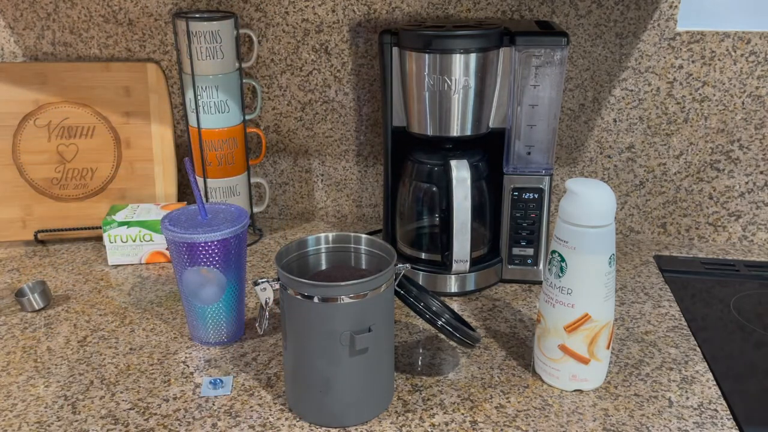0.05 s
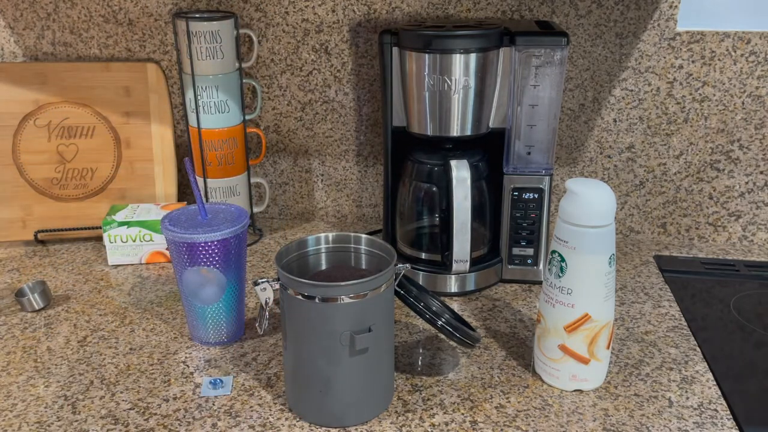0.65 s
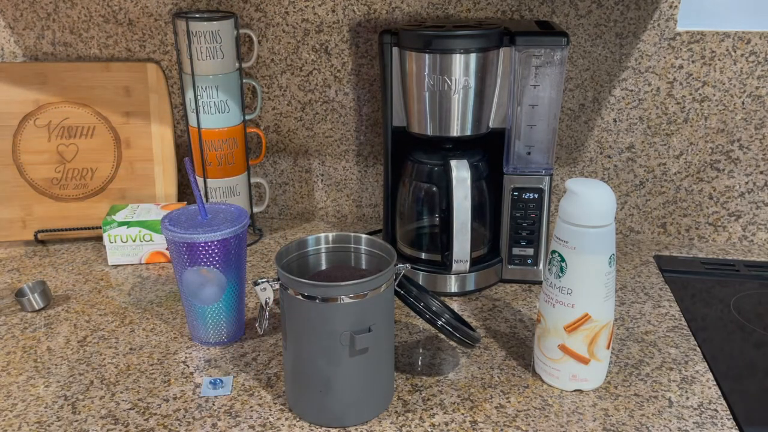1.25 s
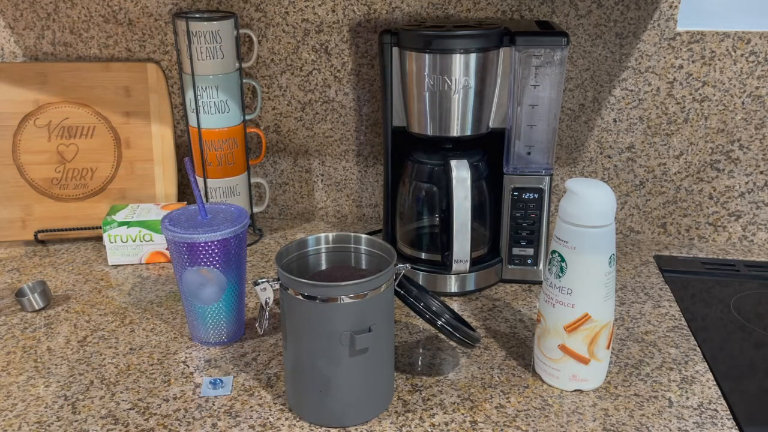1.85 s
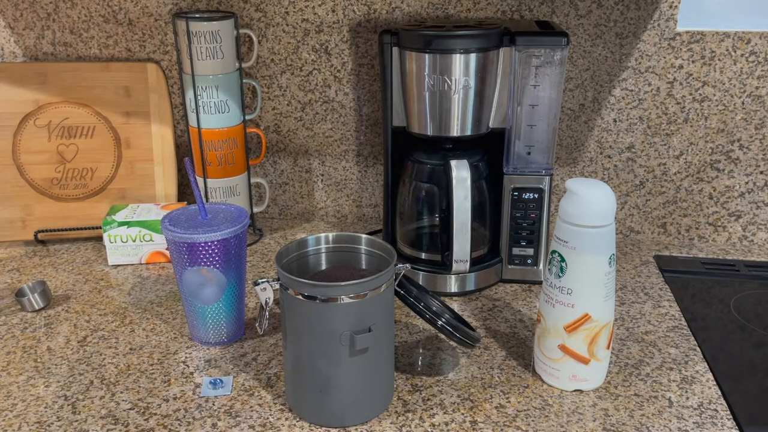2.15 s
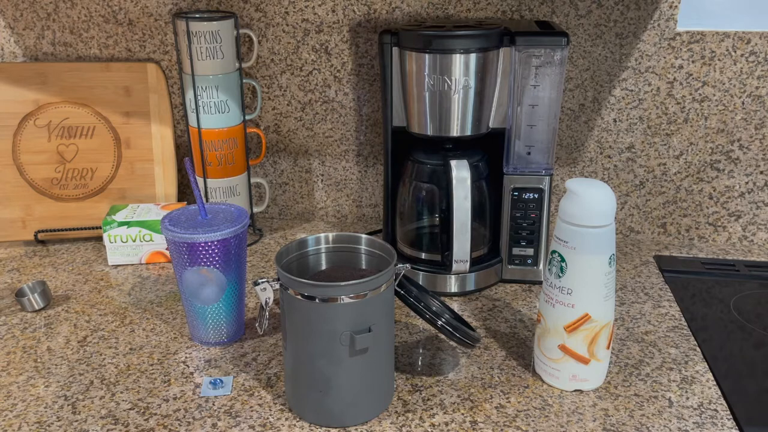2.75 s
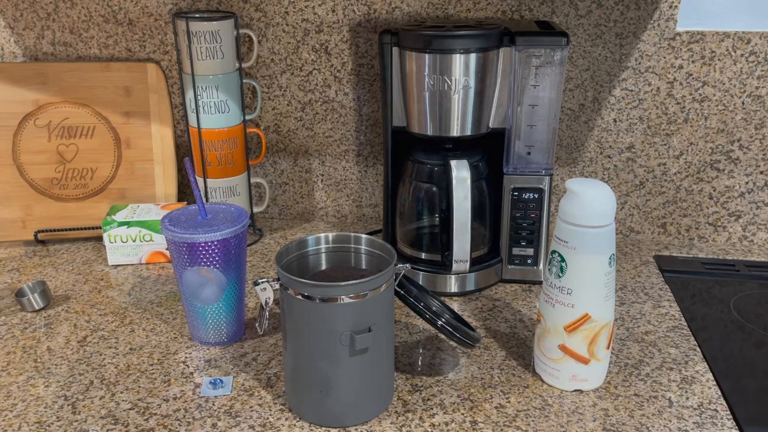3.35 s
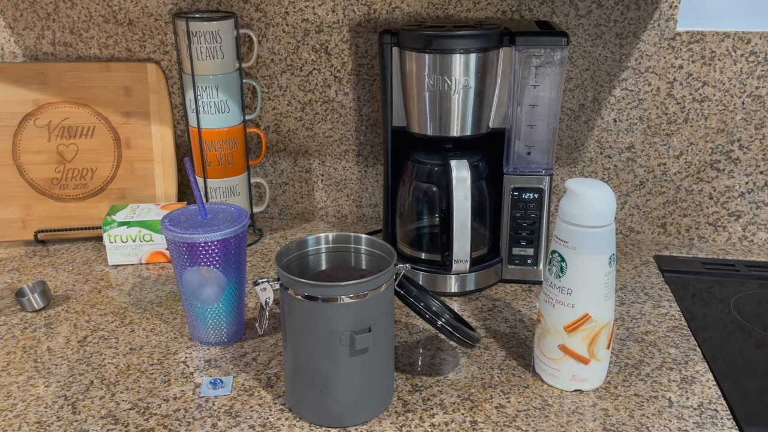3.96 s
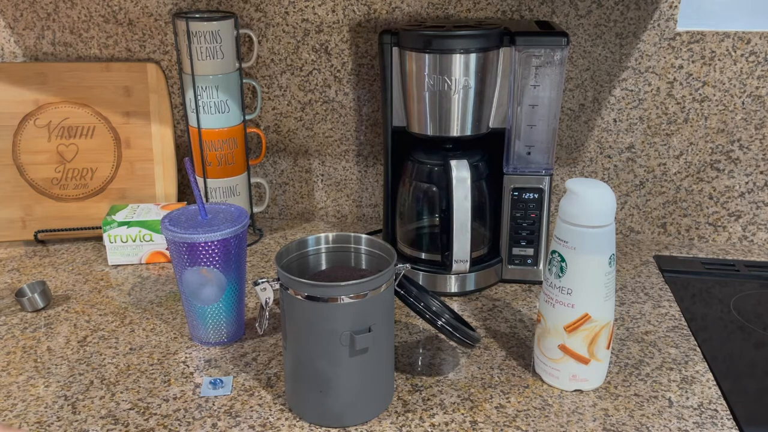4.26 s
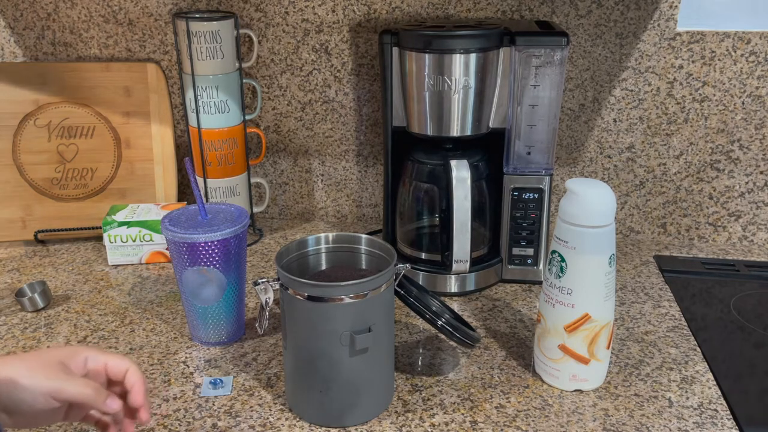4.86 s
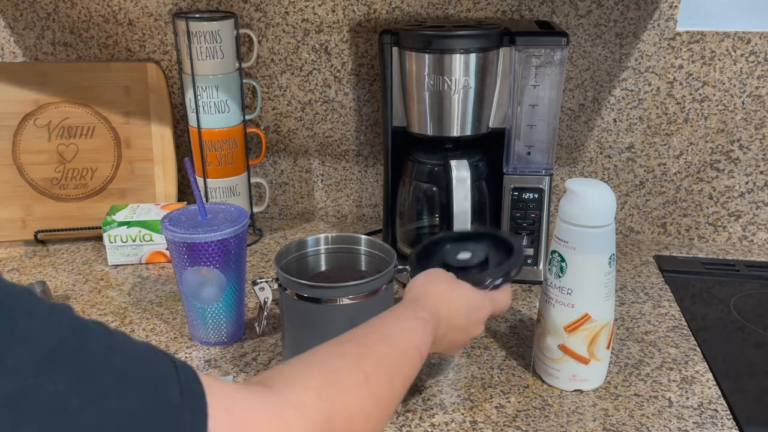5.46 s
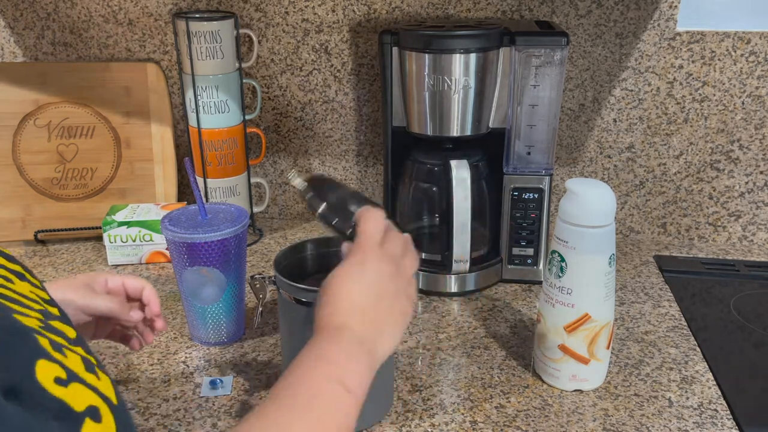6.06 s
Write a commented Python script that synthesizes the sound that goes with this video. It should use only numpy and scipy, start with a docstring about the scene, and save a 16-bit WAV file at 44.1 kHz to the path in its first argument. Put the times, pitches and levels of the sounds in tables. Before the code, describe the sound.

A stiff bag crackles as coffee grounds are shaken out, followed by dull bumps, a clink and a canister lid clacking.

```python
"""A stiff bag crackles in a small kitchen as coffee grounds are shaken out: creases snap, panels
flap and the grounds patter over the film. The bag is put away with dull bumps on the worktop,
scrapes and a clink of kitchenware. Something hollow ticks lightly, then the lid of a steel canister
is picked up from the stone counter, its shell clacking and its rim ringing faintly.
An appliance hums under it all."""
import sys
import numpy as np
from scipy import signal
from scipy.fft import rfft, irfft, next_fast_len
from scipy.io import wavfile
from scipy.ndimage import uniform_filter1d

SR = 44100
rng = np.random.default_rng(int(sys.argv[2]) if len(sys.argv) > 2 else 0)


def waveform_to_disk(signal):
    """Save audio, clipped to [-1, 1], as 16-bit WAV at the path in sys.argv[1]."""
    frames = np.transpose(np.atleast_2d(signal))
    scaled = np.clip(frames, -1, 1) * 32767
    samples = np.round(scaled).astype(np.int16)
    wavfile.write(sys.argv[1], SR, samples)


N = 273420

# Levels are relative within a table; each layer sets its own gain. Spectra give level per Hz.
# Air of the quiet kitchen (f/Hz, level/dB)
AIR_SPECTRUM = [(15, -44.5), (36, 2), (92, -2.5), (166, -2.5), (254, -9.5), (324, -11), (583, -18),
                (1000, -26.5), (1790, -29.5), (2280, -29.5), (2900, -44), (8030, -26), (12000, -48.5),
                (15600, -80)]
# Tones of the appliance (f/Hz, level/dB)
HUM_TONES = [(59, -72), (177.6, -91.5), (231.5, -85), (333.8, -79)]
# Decay of the room's tail (f/Hz, t60/s)
ROOM_DECAY = [(200, 0.43), (1400, 0.35), (4000, 0.4), (10000, 0.27)]

# Hands, sleeves and film brushing things (t/s, length/s, level/dB)
BRUSH_STROKES = [(1.52, 0.024, -52), (1.784, 0.13, -58.5), (2.037, 0.14, -55.5), (2.29, 0.27, -58.5),
                 (2.53, 0.013, -44), (3.01, 0.18, -61.5), (3.445, 0.58, -68.5), (4.142, 0.027, -60),
                 (4.528, 0.2, -61), (4.974, 0.018, -59), (5.24, 0.025, -62), (5.379, 0.25, -64)]
# Bright patter of brushing and of running grounds (f/Hz, level/dB)
PATTER_SPECTRUM = [(800, -12.5), (2000, -5), (4000, -6), (6700, -8), (8000, 1), (9300, -1), (11000, -2.5),
                   (14000, -4.5)]
# Dry squeaks (t/s, length/s, f/Hz, level/dB)
DRY_SQUEAKS = [(1.978, 0.08, 3060, -55), (5.394, 0.012, 2960, -60)]
# Things dragged over the counter (t/s, length/s, scrape level/dB, rumble level/dB)
DRAG_STROKES = [(1.666, 0.2, -64, -59), (1.957, 0.33, -66, -68), (2.505, 0.027, -50.5, -43.5),
                (2.572, 0.019, -55, -46), (2.693, 0.044, -48.5, -43), (2.977, 0.068, -53, -51.5),
                (3.06, 0.055, -54.5, -55.5), (3.804, 0.13, -74, -59.5), (4.195, 0.65, -70.5, -65),
                (4.942, 0.19, -66.5, -61.5), (5.185, 0.31, -63, -58.5), (5.504, 0.03, -51, -45.5),
                (5.8, 0.091, -87, -65.5)]
# Low weight of a drag (f/Hz, level/dB)
RUMBLE_SPECTRUM = [(35, -32), (60, -11), (151, -6), (194, -5.5), (283, -12.5), (355, -5), (700, -12.5),
                   (910, -35.5), (1540, -120)]
# Grit of a drag (f/Hz, level/dB)
SCRAPE_SPECTRUM = [(260, -50), (450, -29), (533, -6), (774, -6), (862, -5.5), (1650, -8), (1860, -13.5),
                   (2150, -12.5), (5380, -21.5), (8000, -22), (10400, -19), (17600, -120)]
# Hollow body being dragged (f/Hz, width/Hz, level/dB)
DRAG_MODES = [(370, 55, 0), (830, 510, -19)]
# Light ticks (t/s, level/dB)
TICK_HITS = [(3.655, -62), (3.7252, -59), (3.8725, -58), (3.9822, -55), (4.0332, -54.5), (4.151, -52),
             (4.243, -52), (4.289, -51.5), (4.3514, -62), (4.374, -56), (4.507, -47), (4.5865, -54),
             (4.6351, -51), (4.681, -52.5), (4.7529, -50.5), (4.805, -49.5), (4.834, -54), (4.939, -52),
             (4.9702, -53), (5.0416, -50.5), (5.0787, -50), (5.276, -48), (5.3131, -48.5), (5.37, -51),
             (5.4184, -50)]
# Hollow thing that ticks (f/Hz, width/Hz, level/dB)
TICK_MODES = [(896, 220, 12), (1504, 170, 14), (1724, 90, 9), (2140, 110, 5)]
# Hollow vessel (f/Hz, width/Hz, level/dB)
VESSEL_MODES = [(186, 21, -8), (402, 40, -8.5), (535, 28, 0.5), (1038, 66, -10)]
# Kitchenware rubbing (t/s, length/s, level/dB)
RUB_STROKES = [(2.926, .01, -53), (2.974, 0.036, -53), (3.012, 0.018, -47.5)]
# Kitchenware touching (t/s, level/dB)
CLINK_HITS = [(2.783, -40.5), (3.087, -43), (3.139, -30)]
# Ring of the kitchenware (f/Hz, width/Hz, level/dB)
WARE_MODES = [(876, 22, 3.5), (1140, 17, -8), (1502, 26, 0.5), (1766, 16, -4), (2013, 15, 2), (2510, 16, 0),
              (2624, 11, 3.5), (3752, 15, -7), (4100, 22, -0.5), (4260, 12, -8)]
# The lid clacking in the hand (t/s, level/dB)
LID_HITS = [(5.164, -35), (6.002, -49)]
# The lid's hollow shell (f/Hz, width/Hz, level/dB)
SHELL_MODES = [(1020, 190, -1.5), (1530, 220, 2.5), (2180, 200, 0), (4580, 350, -12)]
# The lid's steel rim (f/Hz, level/dB)
RIM_MODES = [(2347, 0), (4694, -13)]
# Padded blows on the worktop (t/s, level/dB, low-pass corner f/Hz)
BUMP_HITS = [(2.493, -26.5, 230), (2.514, -41, 200), (2.531, -33, 330), (2.594, -28.5, 170),
             (2.609, -34.5, 130), (2.686, -34, 900), (2.702, -33.5, 550), (2.726, -29.5, 900),
             (2.744, -34, 302), (2.784, -39, 505), (3.016, -34, 247), (5.506, -30.5, 1200),
             (5.524, -31.5, 1000)]
# Low boomy pitches of the bumps (f/Hz, width/Hz, level/dB)
BUMP_PEAKS = [(106.4, 19, -7.5), (197, 16, 1), (272, 43, -4), (358, 19, 4.5), (532, 35, 4.5),
              (946, 89, 8.5), (1360, 42, -8)]
# Knocks of bag, kitchenware and lid (t/s, level/dB, body f/Hz, thud over body/dB, hardness/dB)
KNOCK_HITS = [(0.054, -24, 1530, -17.5, -40), (0.136, -21.5, 800, -6, -0.5), (0.18, -21.5, 1280, -20, -8),
              (0.267, -17.5, 1350, -16.5, -2), (0.395, -26, 1050, -11, -0.5),
              (0.592, -26.5, 1610, -12.5, -20), (0.674, -25.5, 710, -24, -10), (0.78, -26, 1050, -26, -2),
              (1.04, -21.5, 3420, -44, 4), (1.138, -28.5, 1500, 4, -6.5), (1.417, -23, 530, -4.5, -6.5),
              (1.818, -41.5, 1400, -3, 19), (2.004, -37.5, 1370, -21, 6), (2.033, -37, 1400, 2, 8),
              (2.097, -29.5, 1600, -34, 8.5), (2.194, -32.5, 760, -24, 12), (2.33, -40, 1360, -2, 13),
              (2.451, -39.5, 920, -15, -11), (2.524, -27.5, 1020, 8, -15), (2.619, -31.5, 544, 36, 60),
              (2.724, -33.5, 795, -14, 2), (2.782, -32.5, 820, -7, -6), (2.785, -39.5, 2930, -8, -14),
              (2.876, -42.5, 720, -16, -26), (3.021, -38.5, 1010, -14, -6), (3.088, -30.5, 1150, -13, -23),
              (3.14, -30, 893, -27, -2), (3.419, -48, 1350, -8, -5), (3.896, -38, 1330, -24, -27),
              (3.898, -43.5, 3050, -27, -7), (5.294, -42, 1520, 13, 60), (5.506, -36, 875, -8, -14),
              (5.548, -41, 870, -16, -9), (5.585, -31.5, 954, -7, -0.5), (6.1548, -36, 1120, 11, 12)]

# Flow of the grounds (t/s, level/dB)
POUR_CURVE = [(0.0, -36), (0.11, -50.5), (0.2, -34), (0.322, -45), (0.52, -40.5), (0.998, -37),
              (1.108, -37.5), (1.24, -44), (1.33, -48.5), (1.444, -47.5), (1.594, -47.5), (1.7, -71)]
# Shakes that jolt the bag (t/s, level/dB)
BAG_SHAKES = [(0.061, -35.5), (0.15, -31.5), (0.262, -34.5), (0.391, -37), (0.548, -36), (0.673, -39.5),
              (0.85, -43.5), (1.416, -46), (1.2, -38), (1.51, -44)]
# Small creases crackling (f/Hz, level/dB)
CRINKLE_SPECTRUM = [(88, -60.5), (150, -15), (464, -4.5), (558, 1), (886, 0), (972, 5.5), (4780, -6),
                    (6910, -6.5), (8960, -0.5), (10200, -15), (11200, -1.5), (12500, -11.5), (16200, -55),
                    (22000, -120)]
# The bag's walls bending (f/Hz, level/dB)
FLEX_SPECTRUM = [(90, -13), (190, -7.5), (280, -12), (370, 0), (550, -3.5), (800, -0.5), (1500, -27.5)]
# Big creases snapping (t/s, level/dB, panel f/Hz, brightness/dB: a tilt from crack to fizz)
CREASE_SNAPS = [(0.0511, -8.5, 1480, -7), (0.1316, -9, 810, 2), (0.1505, 1.5, 2020, 0.5),
                (0.161, -13.5, 990, 10), (0.167, 0.5, 1320, -1.5), (0.2202, -6.5, 1870, 0),
                (0.25, -18.5, 3100, -12), (0.261, -3.5, 2350, -2.5), (0.2737, -18, 1000, 10),
                (0.3327, -12, 2230, 3.5), (0.361, -4, 1120, 1), (0.374, -7.5, 2830, 6),
                (0.392, -10, 2640, -7.5), (0.436, -8, 2260, 6.5), (0.5025, -20, 3100, -4.5),
                (0.582, -9, 1920, 0), (0.651, -22.5, 2140, 8), (0.6701, -9.5, 2490, -3),
                (0.6941, -11.5, 2140, -1), (0.7092, -13, 2250, -3), (0.761, -18, 2460, 1),
                (0.7873, 10.5, 1060, 27), (0.804, -10.5, 2240, -0.5), (0.8602, -17, 2350, -5.5),
                (0.8978, -18, 2150, -2.5), (0.9359, -8.5, 2250, 8), (0.9714, -3.5, 2430, -3.5),
                (1.003, -3, 2170, -1.5), (1.0096, -11, 2130, 4), (1.0296, -11.5, 3560, -10.5),
                (1.0364, -11.5, 3600, -12), (1.074, -15.5, 4300, -9), (1.0802, -21, 2080, -13),
                (1.135, -19.5, 2080, -4), (1.1969, -6.5, 2460, -1), (1.258, -8.5, 1680, 8),
                (1.5013, -19, 2040, -3)]

# Stereo width (f/Hz, side level/dB)
STEREO_WIDTH = [(40, -15), (130, -13), (280, -6), (550, -1.5), (1400, 0), (2800, -6), (6500, -4.5),
                (8400, -14), (12000, -51)]
# Stereo balance (f/Hz, left over right level/dB)
STEREO_BALANCE = [(100, 1), (500, 2), (1200, 1.5), (4500, 3.5), (6500, 3.5), (8000, 0)]
# Phase between the microphone ports (f/Hz, left lead/rad)
PORT_LEAD = [(200, 0), (2000, .3), (3400, 1.1), (4400, .6), (5600, .8), (6700, .1), (7700, 1), (8600, 0),
             (9400, -1.5), (10250, -3.1), (11000, -4.5), (11900, -6.1), (12600, -6.4), (13700, -9.4),
             (15500, -12.6)]
# Treble resonance and roll-off of the ports (f/Hz, level/dB)
PORT_RESPONSE = [(9000, 1), (10300, 6.5), (11200, 3), (12200, -19.5), (13200, -36.5), (15000, -49.5)]


def amp(db):
    """Decibels to gain."""
    return 10 ** (np.asarray(db) / 20)


def unit(x):
    """x scaled to rms 1."""
    return x / np.sqrt(np.mean(x ** 2) + 1e-20)


def along(points, hz):
    """Curve through (f/Hz, value) points on a log frequency axis."""
    freqs, values = np.transpose(points)
    return np.interp(np.log(hz + 1), np.log(freqs + 1), values)


def add(track, s, x):
    """Mix x into the track at time s."""
    part = track[:, max(round(s * SR), 0):][:, :x.shape[-1]]
    part += x[..., :part.shape[1]]


def filtered(x, response):
    """x times a complex response of frequency."""
    size = next_fast_len(x.shape[-1] + SR // 4)
    return irfft(rfft(x, size) * response(np.fft.rfftfreq(size, 1 / SR)), size)[..., :x.shape[-1]]


def coloured(x, spectrum, size=2048):
    """x through a minimum-phase EQ with the given (f/Hz, level/dB) spectrum."""
    gain = amp(along(spectrum, np.fft.rfftfreq(size, 1 / SR)))
    cepstrum = irfft(np.log(gain + 1e-6))
    cepstrum[1:size // 2] *= 2
    cepstrum[size // 2 + 1:] = 0
    impulse = irfft(np.exp(rfft(cepstrum)))
    return signal.fftconvolve(x, impulse[None], axes=1)[:, :x.shape[1]]


def resonant(x, modes):
    """x through damped (f/Hz, width/Hz, level/dB) resonances."""
    return filtered(x, lambda f: sum(amp(db) * 1j * f * width / (hz * hz - f * f + 1j * f * width)
                                     for hz, width, db in modes))


def evened(x):
    """A burst with its energy spread evenly over all pitches."""
    spectrum = rfft(x)
    return irfft(spectrum / np.sqrt(np.mean(abs(spectrum) ** 2, axis=0) + 1e-20))


def clumped(x, depth_db):
    """Energy gathers in brief patches of pitch as one small spot after another gives way."""
    frames = signal.stft(x, nperseg=256)[2]
    patches = uniform_filter1d(rng.standard_normal(frames.shape[1:]), size=6, axis=0)
    patches = uniform_filter1d(patches, size=6, axis=1)
    return signal.istft(frames * amp(depth_db * unit(patches)), nperseg=256)[1][:, :N]


def burst(rise_s, t60, spread):
    """Stereo noise that swells and dies within moments; spread is its side gain."""
    t = np.arange(SR // 8) / SR
    envelope = amp(-60 * t / t60) * (1 - np.exp(-(t / rise_s) ** 2))
    mid, side = rng.standard_normal((2, len(t))) * envelope
    return np.array([mid + spread * side, mid - spread * side])


def grains(per_s, scatter_db, spread):
    """Stereo train of tiny impulses of uneven size, rms 1."""
    size = amp(scatter_db * np.minimum(rng.exponential(size=N), 3))
    mid, side = rng.standard_normal((2, N)) * size * (rng.random(N) < per_s / SR)
    return unit(np.array([mid + spread * side, mid - spread * side]))


def swell(start_s, hold_s, db, rise=302, fall=105):
    """Gain that reaches db at start_s, holds and dies; slopes in dB/s, by default a hand's stroke."""
    t = np.arange(N) / SR - start_s
    return amp(db + rise * np.minimum(t, 0) - fall * np.maximum(t - hold_s, 0))


def in_kitchen(x, near_db, room_db, near_t60=0.09, counter_db=-12, counter_s=0.0055):
    """Direct sound, a bounce off the counter, scatter from nearby things and the room's tail."""
    hz, t, frames = signal.stft(rng.standard_normal((2, SR // 2)), SR, nperseg=256)
    decay = amp(-60 * t / along(ROOM_DECAY, hz)[:, None])
    tail = signal.istft(frames * decay, SR, nperseg=256)[1]
    t = np.arange(tail.shape[1]) / SR
    near = rng.standard_normal(tail.shape) * amp(-60 * t / near_t60)
    echo = amp(near_db) * unit(near) + amp(room_db) * unit(tail)
    echo *= np.minimum(t / counter_s, 1) / np.sqrt(len(t))
    echo[:, 0] += 1
    echo[:, round(counter_s * SR)] += amp(counter_db)
    return signal.fftconvolve(x, echo, axes=1)[:, :N]


def room_tone():
    """The bed: soft air noise and the hum of an appliance."""
    t = np.arange(N) / SR
    hum = sum(amp(db) * np.sqrt(2) * np.sin(2 * np.pi * (hz * t + rng.random())) for hz, db in HUM_TONES)
    air = coloured(rng.standard_normal((2, N)), AIR_SPECTRUM, size=8192)
    return hum + amp(-59) * unit(air)


def patter():
    """Grounds running over film, or hands over things: tiny contacts merge into a bright rustle."""
    contacts = coloured(grains(per_s=3000, scatter_db=6.5, spread=0.82), PATTER_SPECTRUM)
    return unit(in_kitchen(contacts, near_db=6, room_db=1.5))


def brushing():
    """Each stroke of a hand or sleeve swells quickly and trails off."""
    strokes = np.max([swell(s, length, db, fall=103) for s, length, db in BRUSH_STROKES], axis=0)
    return amp(3) * strokes * patter()


def squeaks(width_hz=750):
    """A dry surface chatters for a moment in one broad resonance."""
    out = np.zeros((2, N))
    for s, length, hz, db in DRY_SQUEAKS:
        mode = [(hz, width_hz, 0)]
        chatter = grains(per_s=1900, scatter_db=2.5, spread=1.0)
        out += swell(s, length, db, rise=970, fall=820) * unit(resonant(resonant(chatter, mode), mode))
    return out


def sliding():
    """Things dragged over the counter catch and slip: a hollow rumble under a gritty scrape."""
    grit, weight = np.zeros((2, N))
    for s, length, scrape_db, rumble_db in DRAG_STROKES:
        grit = np.maximum(grit, swell(s, length, scrape_db))
        weight = np.maximum(weight, swell(s, length, rumble_db))
    rumble = coloured(grains(per_s=300, scatter_db=2.5, spread=0.69), RUMBLE_SPECTRUM)
    rasp = coloured(grains(per_s=900, scatter_db=2.0, spread=0.52), SCRAPE_SPECTRUM)
    rasp = clumped(rasp, depth_db=2.5)
    scrape = in_kitchen(rasp + resonant(rasp, DRAG_MODES), near_db=8.5, room_db=-2)
    return amp(-3.5) * weight * unit(rumble) + amp(3) * grit * unit(scrape)


def ticking(detune=0.045, scatter_db=2):
    """Each soft tick swells and dies in a few short resonances, a little higher or lower each time."""
    out = np.zeros((2, N))
    push = signal.unit_impulse((1, SR // 8))
    for s, db in TICK_HITS:
        modes = [(hz * (1 + detune * rng.standard_normal()), width,
                  level + scatter_db * rng.standard_normal()) for hz, width, level in TICK_MODES]
        tick = unit(resonant(resonant(push, modes), modes))  # two passes soften the attack
        add(out, s, amp(db - 19) * in_kitchen(tick, near_db=-1.5, room_db=-4))
    return out


def vessel_drone():
    """Light friction keeps the hollow vessel's low modes sounding faintly just after the pour."""
    friction = rng.standard_normal((2, N))
    drone = unit(resonant(resonant(friction, VESSEL_MODES), VESSEL_MODES))
    return swell(start_s=1.74, hold_s=0.1, db=-62) * drone


def vessel_bonk(at_s=1.418):
    """One soft bump near the end of the pour sets the vessel's low modes ringing."""
    out = np.zeros((2, N))
    ring = unit(resonant(signal.unit_impulse((1, SR // 8)), VESSEL_MODES))
    add(out, at_s, amp(-44.5) * in_kitchen(ring, near_db=-0.5, room_db=-17))
    return out


def rubbing(grip_damping_hz=25):
    """Kitchenware catches and slips, humming in its lowest mode; the hand on it widens its modes."""
    strokes = sum(swell(s, length, db, rise=700, fall=290) for s, length, db in RUB_STROKES)
    slips = grains(per_s=500, scatter_db=2.5, spread=0.57)
    slips = clumped(coloured(slips, [(900, 1.5), (2500, -14), (5000, -15)]), depth_db=3.5)
    held_modes = [(hz, width + grip_damping_hz, db) for hz, width, db in WARE_MODES]
    return strokes * unit(resonant(slips, held_modes))


def clinks():
    """Kitchenware chatters briefly on contact, then its modes ring on into the room."""
    out = np.zeros((2, N))
    for s, db in CLINK_HITS:
        contact = evened(burst(rise_s=0.0028, t60=0.03, spread=0.98))
        ring = unit(resonant(np.pad(contact, ((0, 0), (0, SR // 2))), WARE_MODES))
        add(out, s, amp(db - 28.5) * in_kitchen(ring, near_db=-12, room_db=-5.5))
    return out


def lid(lift_s=5.385, rim_t60=1.5, beat_hz=5):
    """The lid's shell clacks in the hand; leaving the stone, its rim sings in beating mode pairs."""
    out, t = np.zeros((2, N)), np.arange(SR) / SR
    for s, db in LID_HITS:
        contact = evened(burst(rise_s=0.00085, t60=0.022, spread=0.5))
        clack = unit(resonant(contact, SHELL_MODES))
        add(out, s, amp(db - 21) * in_kitchen(clack, near_db=-3.5, room_db=-3))
    envelope = amp(-66 - 60 * t / rim_t60) * (1 - np.exp(-t / 0.0086))
    for hz, db in RIM_MODES:
        twin = 0.27 * np.sin(2 * np.pi * ((hz + beat_hz) * t + rng.random()))
        add(out, lift_s, amp(db) * envelope * (np.sin(2 * np.pi * hz * t) + twin))
    return out


def bumps():
    """Padded blows on the worktop: the softest only boom, firmer ones knock."""
    out = np.zeros((2, N))
    boom = resonant(signal.unit_impulse((1, SR // 4)), BUMP_PEAKS)
    for s, db, corner_hz in BUMP_HITS:
        blow = unit(filtered(boom, lambda f: 1 / (1 + 1j * f / corner_hz) ** 3))
        add(out, s, amp(db - 28.5) * in_kitchen(blow, near_db=1.5, room_db=-3.5))
    return out


def knocks():
    """Damped blows, each with its own weight and hollow pitch; harder contact adds clack and tick."""
    out = np.zeros((2, N))
    for s, db, hz, thud, hard in KNOCK_HITS:
        weight = [(60, thud - 16), (220, thud)]
        body = [(hz / 1.4, -9), (hz, 0), (hz * 1.22, -8)]
        clack = [(3300, -13.5 + 0.64 * hard)]
        tick = [(6500, hard - 15), (9000, hard - 13), (14000, hard - 16)]
        contact = burst(rise_s=0.0013, t60=0.037, spread=0.97)
        blow = unit(coloured(contact, weight + body + clack + tick))
        add(out, s, amp(db - 19.5) * in_kitchen(blow, near_db=0, room_db=-3.5))
    return out


def flow():
    """Gain of the stream of grounds, silent once the pour is over."""
    return amp(np.interp(np.arange(N) / SR, *np.transpose(POUR_CURVE), right=-np.inf))


def pouring():
    """Grounds patter over the bag's film, as loud as they flow."""
    return amp(-7) * flow() * patter()


def crumpling():
    """Small creases crackle as the bag empties; shakes stir more and bend its walls in a papery rumble."""
    jolts = sum(swell(s, hold_s=0.008, db=db, rise=2996.5, fall=178) for s, db in BAG_SHAKES)
    effort = np.hypot(amp(-1) * flow(), amp(-0.5) * jolts)
    bending = np.hypot(amp(-15) * flow(), amp(-9.5) * jolts)
    crackle = coloured(grains(per_s=650, scatter_db=4.5, spread=0.76), CRINKLE_SPECTRUM)
    crackle = clumped(crackle, depth_db=1.8)
    walls = coloured(grains(per_s=240, scatter_db=6.5, spread=1.0), FLEX_SPECTRUM)
    return effort * unit(in_kitchen(crackle, near_db=2, room_db=-3.5)) + bending * unit(walls)


def snaps(panel_width=0.16):
    """A crease buckles with a sharp click and the panel around it flaps."""
    out = np.zeros((2, N))
    for s, db, hz, bright in CREASE_SNAPS:
        panel_db = -23 - 0.81 * db - 0.61 * bright  # hard, bright snaps carry a smaller share of flap
        crack_db, fizz_db = -14.5 - bright / 2, -11 + bright / 2
        crease = [(700, -36), (1600, panel_db - 4), (4200, crack_db), (6500, (crack_db + fizz_db) / 2 - 4),
                  (9000, fizz_db), (12000, fizz_db), (15000, fizz_db + 3 + 0.24 * bright)]
        stretch = amp(-0.22 * bright)  # brighter creases buckle faster
        buckle = evened(burst(rise_s=0.0006 * stretch, t60=0.0056 * stretch, spread=0.73))
        click = unit(coloured(buckle, crease))
        push = burst(rise_s=0.0013, t60=0.01, spread=0.24)
        flap = unit(resonant(push, [(hz, panel_width * hz, 0)]))
        wet_db = -4 - 0.12 * max(bright, 0) - 0.2 * db  # bright or strong snaps face the microphone
        add(out, s + 0.00065, amp(db - 29) * in_kitchen(click, near_db=wet_db, room_db=wet_db))
        add(out, s + 0.0006, amp(db + panel_db - 26.5) * in_kitchen(flap, near_db=-4.5, room_db=0))
    return out


def from_left(x, lead_s=0.00036, knee_hz=1410):
    """Lows and mids reach the left side first; higher up the lead is a full cycle and vanishes."""
    def lag_right(hz):
        cycles = np.minimum(hz * lead_s * (1 + (hz / knee_hz) ** 2 / 2), 1)
        return np.exp(-2j * np.pi * np.array([[0], [1]]) * cycles)
    return filtered(x, lag_right)


def scene():
    """The mix: the bag off to the left, kitchenware and lid over the quiet room."""
    bag = from_left(snaps() + crumpling() + pouring())
    handling = knocks() + bumps() + vessel_bonk() + vessel_drone() + sliding() + rubbing()
    details = squeaks() + ticking() + clinks() + lid() + brushing()
    return bag + handling + details + room_tone()


def record(dry, low_cut_hz=28, top_hz=16300):
    """Two close microphone ports: alike in the bass, resonating out of step in the treble, band-limited."""
    sign = np.array([[1], [-1]])
    mid = (dry[0] + dry[1]) / 2
    side = filtered((dry[0] - dry[1]) / 2, lambda hz: amp(along(STEREO_WIDTH, hz)))

    def ports(hz):
        gain = amp(along(PORT_RESPONSE, hz) + sign * along(STEREO_BALANCE, hz) / 2)
        phase = np.exp(sign * 1j * along(PORT_LEAD, hz) / 2)
        band = (hz < top_hz) * hz ** 2 / np.hypot(hz ** 2, low_cut_hz ** 2)
        return gain * phase * band
    return filtered(mid + sign * side, ports)


dry = scene()
out = record(dry)
waveform_to_disk(out)
```